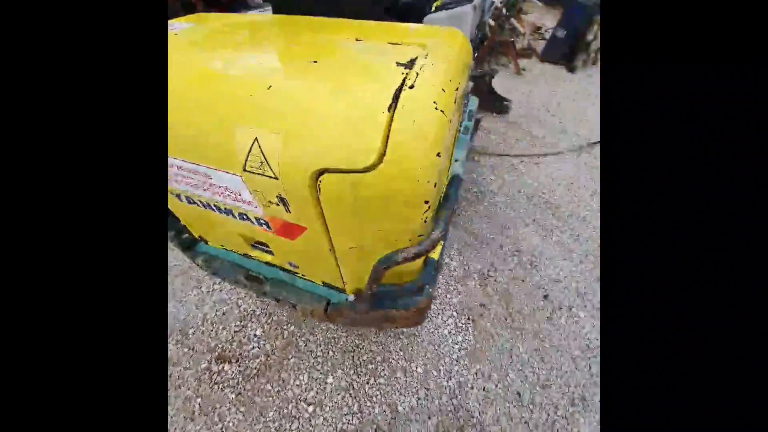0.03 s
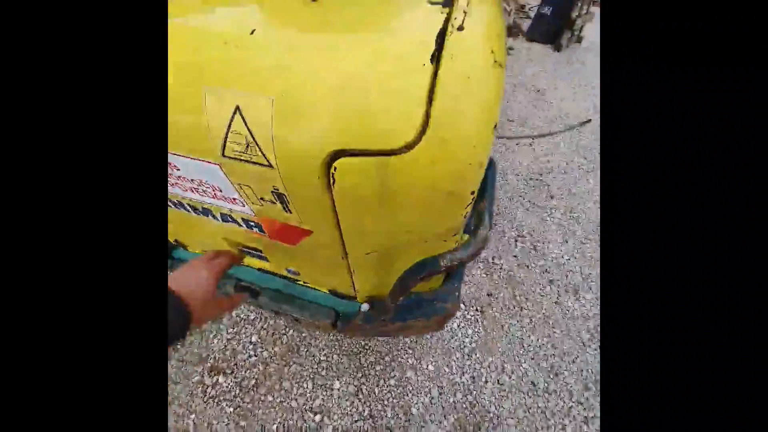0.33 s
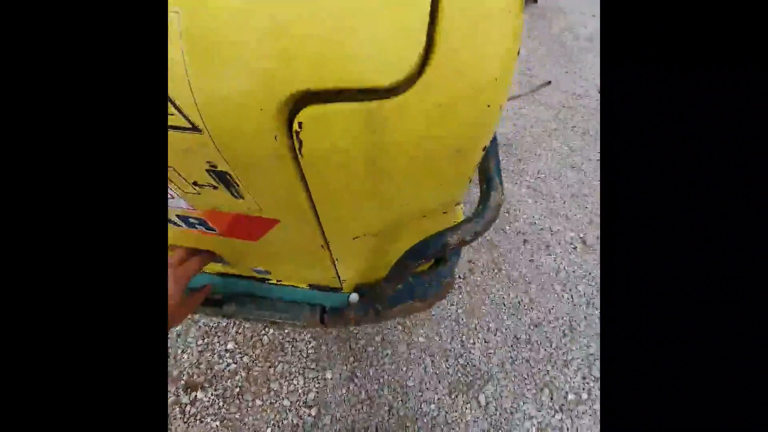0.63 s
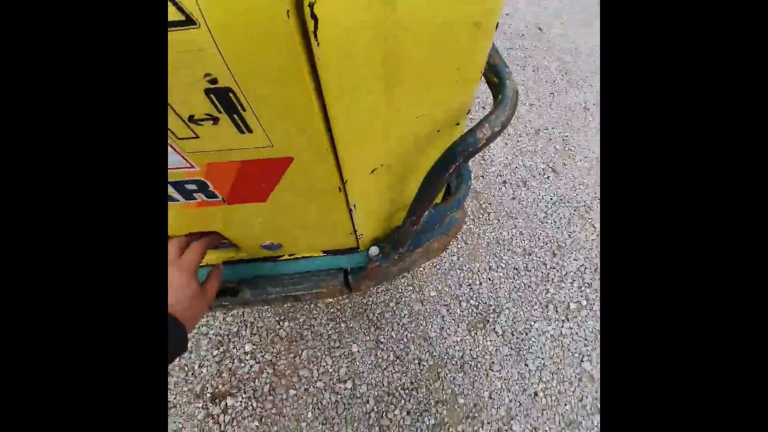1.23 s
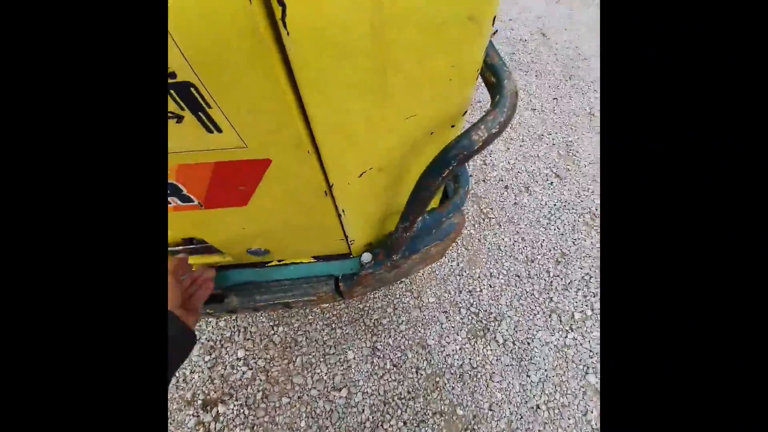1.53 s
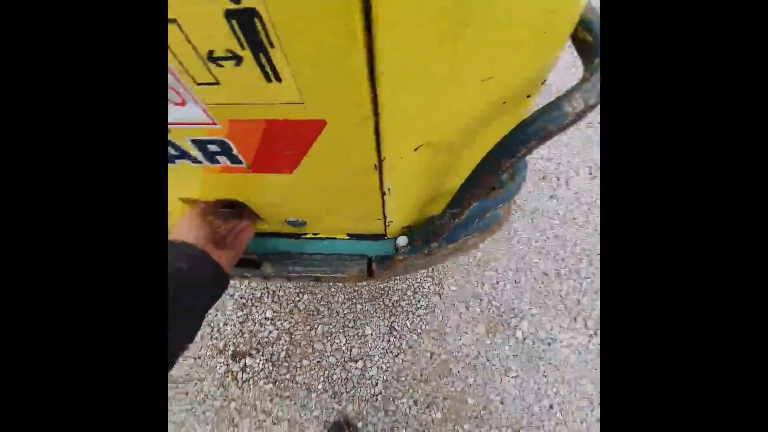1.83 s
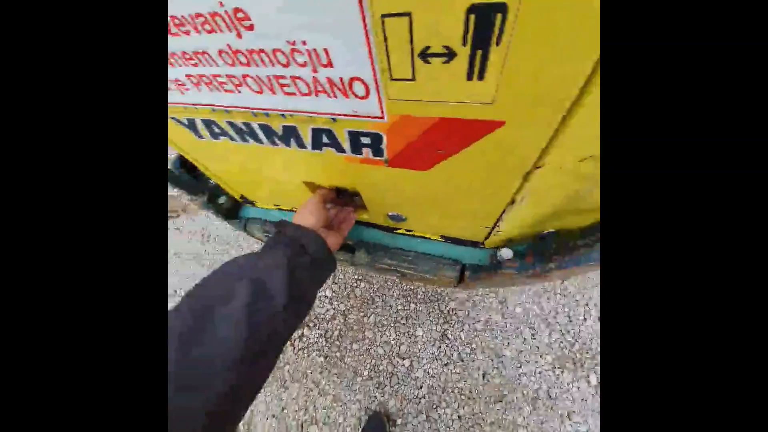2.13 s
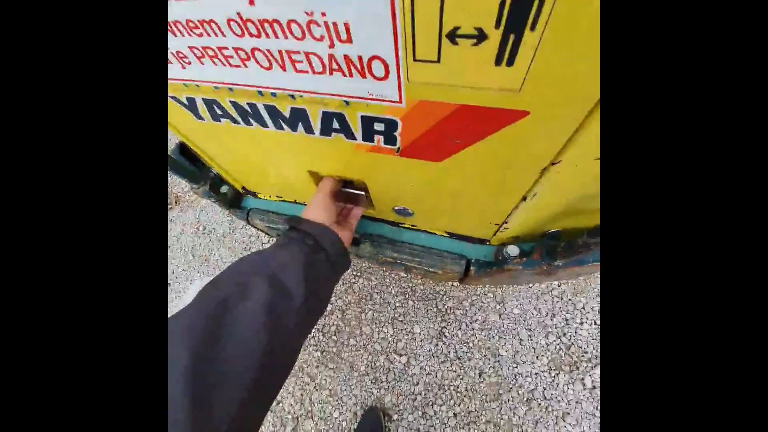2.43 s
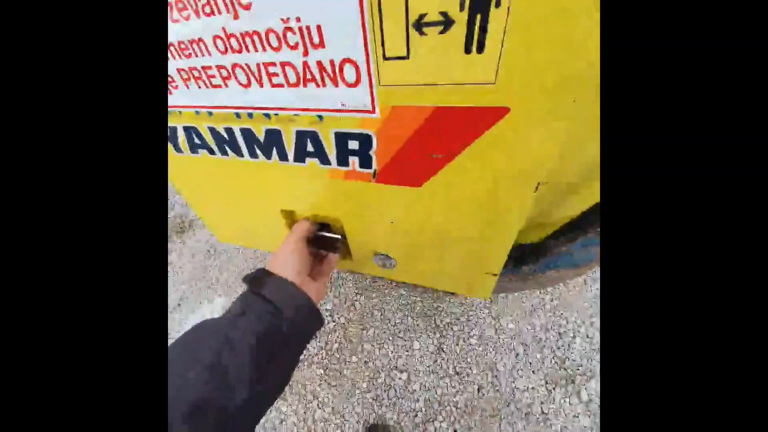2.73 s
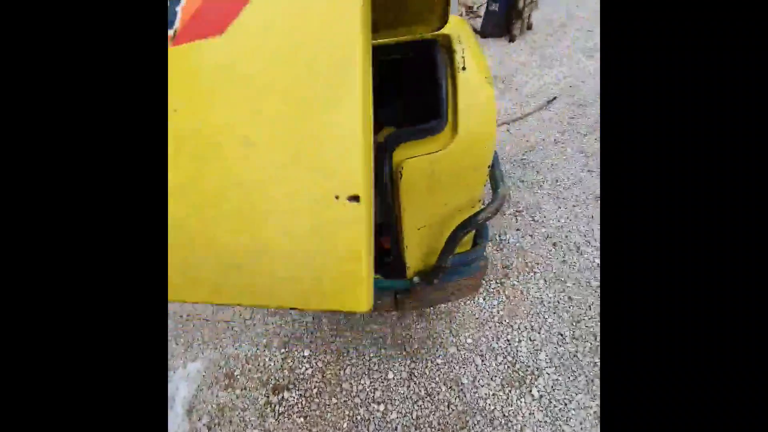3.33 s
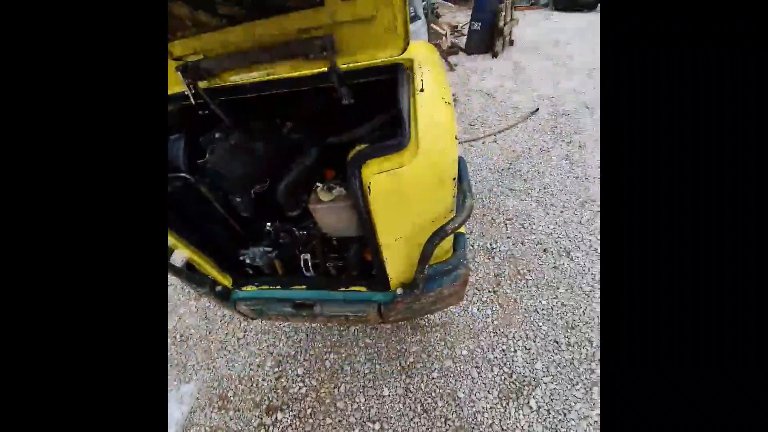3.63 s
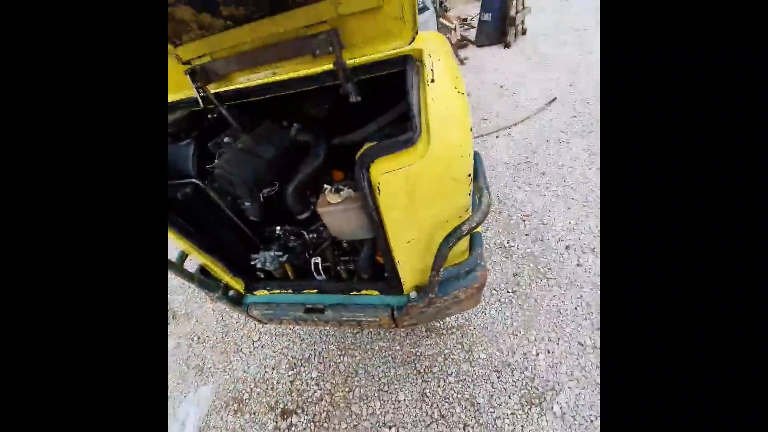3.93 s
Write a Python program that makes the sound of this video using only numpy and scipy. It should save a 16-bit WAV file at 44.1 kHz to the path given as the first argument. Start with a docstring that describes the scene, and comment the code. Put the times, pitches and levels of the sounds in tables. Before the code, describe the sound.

A sheet-metal engine cover is opened by hand, close up outdoors. It knocks on its seat, the latch scrapes, clicks and releases with a boom, then the cover rattles up and clanks into its stay over a low rumble.

```python
"""Outdoors on gravel, close up: a hand works at the sheet-metal engine cover of a machine.
The cover knocks on its seat; the steel latch scrapes, clicks and lets go with a boom. The cover shudders,
swings up rattling and clanks into its stay. Each blow is a noisy crack that rings the steel, over the
boom of the panel's low modes. Behind it: a low rumble, a soft hiss and a faint whine."""
import sys
import numpy as np
from scipy import signal
from scipy.fft import rfft, irfft, next_fast_len
from scipy.io import wavfile
from scipy.ndimage import map_coordinates

SR = 44100
rng = np.random.default_rng(int(sys.argv[2]) if len(sys.argv) > 2 else 0)


def waveform_to_disk(signal):
    """Save audio, clipped to [-1, 1], as 16-bit WAV at the path in sys.argv[1]."""
    frames = np.transpose(np.atleast_2d(signal))
    scaled = np.clip(frames, -1, 1) * 32767
    samples = np.round(scaled).astype(np.int16)
    wavfile.write(sys.argv[1], SR, samples)


N = 176400

CLICK_CRACK_S, CLANK_CRACK_S = .018, .036  # t60 of the crack of latch and stay
# Stereo image of the cover: f/Hz, left-right likeness
COVER_IMAGE = [(150, 0.99), (500, 0.71), (1500, 0.27), (5000, 0.41), (14000, 0.069)]
# The cover hits its stay: t/s, level/dB, boom/dB, body/dB, clang/dB, bite/dB, treble/dB, base t60/s
STAY_BLOW = [(3.933, -6.5, -30, -24, -18, -13.5, -14, 0.13)]
# Its contact settings for blows(); tone: f/Hz, level/dB
STAY_CONTACT = dict(crack_s=CLANK_CRACK_S, ring_db=0, again_s=.0066, again_t60=0.021, again_db=3, gain_db=-1, tone=[(200, -10),
                (520, 1), (850, -3), (1750, 7), (2300, -2.5), (4000, -1), (6000, 5), (9000, -3.5),
                (12500, -1), (16000, -11)])
STOP_S = STAY_BLOW[0][0] + STAY_CONTACT["again_s"]


def amp(db):
    """Decibels to gain."""
    return 10 ** (np.asarray(db) / 20)


def unit(x):
    """Scale to rms 1."""
    return x / np.sqrt(np.mean(x ** 2) + 1e-20)


def fade(t, t60):
    """Exponential decay."""
    return np.exp(-np.log(1000) * t / max(t60, 1e-3))


def along(points, hz):
    """Read (f/Hz, value) points on a log axis."""
    f, v = np.transpose(points)
    return np.interp(np.log(hz + 1), np.log(f + 1), v)


def curve(points):
    """Read (t/s, value) points at every sample."""
    return np.interp(np.arange(N) / SR, *np.transpose(points))


def wobble(rate):
    """A smooth random curve, rate knots a second."""
    return map_coordinates(rng.standard_normal(int(N * rate / SR) + 4), [np.arange(N) * rate / SR])


def add(track, s, sound):
    """Mix a sound in at time s."""
    part = track[:, max(round(s * SR), 0):][:, :sound.shape[-1]]
    part += sound[..., :part.shape[1]]


def noise(tone, image, size=N):
    """Stereo noise of rms 1 with a given colour and left-right likeness."""
    hz = np.fft.rfftfreq(size, 1 / SR)
    turn = np.arccos(np.clip(along(image, hz), -1, 1)) / 2
    spectrum = rfft(rng.standard_normal((2, size))) * amp(along(tone, hz))
    mid, side = irfft(spectrum * [np.cos(turn), np.sin(turn)], size)
    return unit(np.array([mid + side, mid - side]))


def causal(db):
    """The minimum-phase response with this gain."""
    cepstrum = irfft(db * np.log(10) / 20)
    cepstrum[1:len(cepstrum) // 2] *= 2
    cepstrum[len(cepstrum) // 2 + 1:] = 0
    return np.exp(rfft(cepstrum))


def burst(t, t60, rise_s=0.0017):
    """Dying stereo noise of energy 1 a channel."""
    envelope = (1 - np.exp(-(t / rise_s) ** 2)) * fade(t, t60)
    return unit(noise([(1, 0)], COVER_IMAGE, size=len(t)) * envelope) / np.sqrt(len(t))


def yard_air():
    """A wide, soft hiss over the midrange of the yard."""
    # Fader rides: t/s, level/dB
    hiss_ride = [(0, -57), (.35, -53.5), (.8, -60.5), (1.45, -62.5), (1.75, -67.5), (2.1, -63.5),
                 (2.85, -63.5), (3.12, -64.5), (3.33, -75), (4, -75)]
    mid_ride = [(0, -48), (.35, -45), (.9, -51), (2.3, -51), (3.05, -55), (4, -54)]
    # Colours: f/Hz, level/dB
    hiss_tone = [(1760, -36), (3000, -7), (3860, 4), (5070, -3.5), (6860, -0.5), (9140, -12), (12400, -0.5),
                 (16000, -8)]
    mid_tone = [(160, -36), (280, -4.5), (639, -7), (942, -14.5), (1440, -11), (3200, -17), (4160, -38),
                (7040, -120)]
    # Stereo image: f/Hz, left-right likeness
    image = [(60, 0.96), (180, 1), (550, 0.25), (1650, -0.22), (4970, -0.018), (15000, -0.12)]
    hiss = amp(curve(hiss_ride) + 3) * noise(hiss_tone, image)
    return hiss + amp(curve(mid_ride) + 0.5) * noise(mid_tone, image)


def rumble(lump_db=3.5):
    """Handling and air make a lumpy low end, almost mono."""
    # Fader ride: t/s, level/dB
    ride = [(0, -45), (.5, -38.5), (.8, -43.5), (1, -39), (1.5, -41), (1.68, -39.5), (1.74, -34.5),
            (1.8, -39), (2.28, -39.5), (2.56, -34), (2.75, -47), (4, -46)]
    # Colour: f/Hz, level/dB
    tone = [(12, -42), (20, -9), (50, -0.5), (113, -9.5), (156, -8.5), (315, -17), (420, -48), (700, -120)]
    return amp(curve(ride)) * unit(amp(lump_db * wobble(22.01)) * noise(tone, [(100, 0.96)]))


def whine(pitch_hz=1302, drift_hz=1.2, waver_db=1.0):
    """A thin tone that wavers slightly in pitch and level."""
    # Fader ride: t/s, level/dB
    ride = [(0, -52.5), (.8, -61), (1.1, -56), (1.8, -57), (2.25, -66), (2.9, -63), (3.3, -72), (3.6, -57),
            (4, -71)]
    phase = 2 * np.pi * np.cumsum(pitch_hz + drift_hz * wobble(8.3)) / SR
    return amp(curve(ride) - waver_db * wobble(6.93)) * np.sqrt(2) * np.sin(phase)


def contacts(rows, t60, gain_db, width, size=4096):
    """Small contacts, each a burst dying in one resonance."""
    out, t, hz = np.zeros((2, N)), np.arange(size) / SR, np.fft.rfftfreq(size, 1 / SR)
    for s, db, pitch in rows:
        band = 1j * hz * pitch * width / (pitch ** 2 - hz ** 2 + 1j * hz * pitch * width)
        touch = unit(irfft(rfft(burst(t, t60)) * band ** 2)) / np.sqrt(size)
        add(out, s, amp(db + gain_db) * touch * (1 - t / t[-1]))
    return out


def ticks():
    """Latch, handle and hinges tick and snap."""
    # Ticks: t/s, level/dB, f/Hz
    hits = [(0.055, -35.5, 6200), (0.7285, -35, 2260), (0.7457, -35.5, 2400), (0.982, -42.5, 7050),
            (1.0245, -10.5, 1600), (1.213, -15, 3400), (2.397, -14, 2650), (2.464, -16, 2700),
            (3.3139, -32.5, 1960), (3.6387, -34.5, 6200)]
    return contacts(hits, t60=0.018, gain_db=16.5, width=0.29)


def taps():
    """Fingers and catch tap the hollow cover."""
    # Taps: t/s, level/dB, f/Hz
    hits = [(.168, -29.5, 415), (.616, -22.5, 517), (1.025, -23, 795), (1.337, -24, 633), (2.305, -30, 410),
            (3.228, -30, 398)]
    return contacts(hits, t60=0.031, gain_db=20.5, width=0.18)


def steel(hz, scatter_db=2.5):
    """Flat response of the sheet with its ringing modes on top, their heights drawn anew each call."""
    # Modes of sheet and fittings: f/Hz, height/dB, t60/s
    modes = [(414, -2, 0.23), (521, -0.5, 0.14), (599, 1, 0.12), (725, 2.5, 0.077), (1217, 1, 0.094),
             (2080, 2.5, 0.064), (2650, 3, 0.1), (3090, 0, 0.11), (3420, -4.5, 0.36), (4490, -0.5, 0.17),
             (6600, -5, 0.11)]
    response = 1
    for pitch, db, t60 in modes:
        loss = 1j * hz * np.log(1000) / np.pi / t60
        response += amp(db + rng.normal(0, scatter_db)) * loss / (pitch ** 2 - hz ** 2 + loss)
    return response


def ring(t, t60, low_hz=576, top_hz=7800):
    """The dense ring of the sheet, longest in the bass and shortest in the top."""
    bands = [("low", low_hz, 1.9), ("band", [low_hz, top_hz], 0.97), ("high", top_hz, 0.74)]
    return sum(signal.sosfilt(signal.butter(2, hz, kind, fs=SR, output="sos"), burst(t, stretch * t60))
               for kind, hz, stretch in bands)


def boom(t, ring_t60, push_s=0.0047, scatter_db=2.0):
    """The panel's low modes after a short push, damped by the hand."""
    # Panel modes: f/Hz, level/dB, undamped t60/s
    modes = [(101.4, -11.5, 0.34), (140, 2, 0.071), (163.8, -9, 0.48), (180, 2.5, 0.068),
             (228.6, -13, 0.088)]
    swing = sum(amp(db + rng.normal(0, scatter_db, (2, 1))) * fade(t, t60) * np.sin(2 * np.pi * hz * t)
                for hz, db, t60 in modes)
    hand = fade(t, 5.6 * ring_t60)
    return unit(swing * (1 - np.exp(-t / push_s)) * hand) / np.sqrt(len(t))


def blows(rows, crack_s, ring_db, again_s, again_t60, again_db, gain_db, tone, size=16384):
    """Each blow cracks (t60 crack_s), touches again after again_s, rings the steel and booms the panel."""
    # Edges of the body, clang, bite and treble bands: f/Hz
    band_edges = [300, 1100, 2200, 4500, 15000]
    # Panning: t/s, left lead/ms, left over right/dB
    positions = [(0.529, 0.011, -2.5), (0.609, -0.44, -3), (1.03, -0.013, -0.5), (2.4, 0.122, 2),
                 (3.8, 0.25, 0.5)]
    out, t, hz = np.zeros((2, N)), np.arange(size) / SR, np.fft.rfftfreq(size, 1 / SR)
    edges, sides, metal = np.array(band_edges), np.array([[.5], [-.5]]), steel(hz)
    centres, shares = np.sqrt(edges[1:] * edges[:-1]), np.diff(edges) / (SR / 2)
    when, leads, pans = np.transpose(positions)
    taper = np.cos(np.pi / 2 * t / t[-1]) ** 2
    blow_s = 0.017  # sets a blow's energy: its level held for this long
    for s, db, boom_db, *bands_db, t60 in rows:
        hit = burst(t, crack_s) + amp(ring_db) * ring(t, t60)
        add(hit, again_s, amp(again_db) * burst(t, again_t60, rise_s=0.00044))
        band_eq = list(zip(centres, bands_db - 10 * np.log10(shares)))
        colour = causal(along(band_eq, hz) + along(tone, hz))
        lead_s = np.interp(s, when, leads) / 1000
        place = amp(sides * np.interp(s, when, pans)) * np.exp(2j * np.pi * hz * sides * lead_s)
        hit = irfft(rfft(unit(hit) / np.sqrt(size)) * colour * metal * place) * taper
        blow = amp(gain_db) * hit + amp(boom_db) * boom(t, t60)
        add(out, s, amp(db) * np.sqrt(blow_s * SR) * blow)
    return out


def cover_knocks():
    """The cover knocks on its seat."""
    # Knocks: t/s, level/dB, boom/dB, body/dB, clang/dB, bite/dB, treble/dB, base t60/s
    hits = [(0.529, -21, -12.5, -6, -14.5, -22.5, -22, 0.064),
            (1.024, -8, -12.5, -17, -17.5, -40, -51, 0.13), (1.242, -15.5, -9, -7.5, -8, -25, -35, 0.097),
            (1.335, -11, -16, -16.5, -13, -29, -32, 0.099), (1.95, -26.5, -13, -13.5, -10, -21, -29, 0.27),
            (2.178, -26.5, -4, -4, -26.5, -29, -28, 0.14), (2.355, -18, 3.5, -9.5, -15, -21, -30.5, 0.042),
            (3.219, -34, -3.5, -1.5, -17, -36, -46, 0.24)]
    # Cover on seat; tone: f/Hz, level/dB
    contact = dict(crack_s=0.014, ring_db=-3.5, again_s=.007, again_t60=0.016, again_db=-6.5, gain_db=-3, tone=[(150, 0),
               (800, 0.5), (1200, -3.5), (1750, 3), (4400, -0.5), (7000, -1), (9000, -8), (12500, -6),
               (16000, -18)])
    return blows(hits, **contact)


def latch_clicks():
    """The steel latch clicks and lets go with a boom."""
    # Clicks: t/s, level/dB, boom/dB, body/dB, clang/dB, bite/dB, treble/dB, base t60/s
    hits = [(0.599, -27.5, -29, -7.5, -27, 0, -1, 0.077),
            (0.615, -16.5, -22.5, -17, -19.5, -10, -9.5, 0.063),
            (1.212, -9.5, -23, -17, -10, -18, -15, 0.09), (2.396, -7, -4.5, -18, -13, -9, -10, 0.034),
            (2.463, -6.5, -31, -23.5, -13.5, -18, -12.5, 0.048)]
    # Latch on catch; tone: f/Hz, level/dB
    contact = dict(crack_s=CLICK_CRACK_S, ring_db=-2.5, again_s=.0025, again_t60=0.0076, again_db=-3, gain_db=-3, tone=[(300, 2),
               (1100, -4.5), (4400, -8), (5300, -8.5), (6600, -1.5), (9000, -17), (12800, -6),
               (16000, -24)])
    return blows(hits, **contact)


def latch_scrape(grain_db=4):
    """The latch slides on its catch, steel slipping on steel in fine jerks."""
    # Fader ride: t/s, level/dB
    ride = [(1.135, -81), (1.155, -40), (1.185, -37), (1.208, -38.5), (1.225, -58), (1.29, -49),
            (1.32, -53)]
    # Colour: f/Hz, level/dB
    tone = [(120, -24), (200, 6.5), (968, -8.5), (1710, -19), (6050, -17), (9060, -30), (11100, -19),
            (16000, -28)]
    return amp(curve(ride)) * unit(noise(tone, COVER_IMAGE) * amp(grain_db * wobble(260)))


def shudder(start_s=2.404, db=-18.5, low_t60=0.4, treble_t60=0.21, split_hz=1400):
    """The freed cover chatters; the treble dies first."""
    # Colour: f/Hz, level/dB
    tone = [(29, -38), (50, 1.5), (167, -9), (601, -24.5), (729, -13.5), (1020, -24.5), (1500, -19),
            (7570, -34.5), (9000, -42.5)]
    out, t = np.zeros((2, N)), np.arange(N) / SR
    sheet = irfft(rfft(noise(tone, COVER_IMAGE)) * steel(np.fft.rfftfreq(N, 1 / SR)), N)
    chatter = unit(sheet * amp(1.4 * wobble(297)))
    low = signal.sosfilt(signal.butter(1, split_hz, fs=SR, output="sos"), chatter)
    add(out, start_s, amp(db) * (low * fade(t, low_t60) + (chatter - low) * fade(t, treble_t60)))
    return out


def cover_rattles():
    """The cover rattles in light blows as it swings up."""
    # Rattles: t/s, level/dB, boom/dB, body/dB, clang/dB, bite/dB, treble/dB, base t60/s
    hits = [(2.507, -22, -23, -10, -8, -16.5, -14.5, 0.16), (2.574, -28, -6.5, -7.5, -5.5, -9, -9.5, 0.065),
            (2.684, -27.5, -37, -10.5, -7.5, -9.5, -55, 0.076),
            (2.75, -32.5, -22, -13, -5, -7.5, -19, 0.027), (3.725, -33, -17, -10.5, -4.5, -7.5, -32, 0.11),
            (3.771, -27, -28, -7, -7.5, -11, -20.5, 0.084)]
    # Loose contact; tone: f/Hz, level/dB
    contact = dict(crack_s=0.032, ring_db=1.5, again_s=.007, again_t60=0.019, again_db=-3, gain_db=-5, tone=[(300, 0),
               (6600, -2), (9000, -14), (16000, -23)])
    return blows(hits, **contact)


def rasp(db=-24, swell_t60=0.068):
    """A short rasp swells into the last clank and cuts off at the stop."""
    # Colour: f/Hz, level/dB
    tone = [(500, -19), (1500, 2), (16000, -21)]
    to_stop = STOP_S - np.arange(N) / SR
    return amp(db) * (to_stop > 0) * fade(np.abs(to_stop), swell_t60) * noise(tone, COVER_IMAGE)


def stay_clank(lowest_t60=0.37):
    """The stay clanks into its stop and sings on with the cover; higher partials die sooner."""
    # Partials: f/Hz, level/dB
    modes = [(460, -32), (603, -28.5), (1626, -34), (3246, -37), (3854, -36), (6508, -40)]
    out, t = blows(STAY_BLOW, **STAY_CONTACT), np.arange(SR // 2) / SR
    for hz, db in modes:
        t60 = lowest_t60 * (hz / modes[0][0]) ** -.3
        phase = 2 * np.pi * rng.random((2, 1))
        add(out, STOP_S, amp(db) * fade(t, t60) * np.sin(2 * np.pi * hz * t + phase))
    return out


def scene():
    """The cover is unlatched and lifted over the outdoor bed."""
    bed = yard_air() + rumble() + whine()
    unlatching = ticks() + taps() + cover_knocks() + latch_clicks() + latch_scrape()
    lifting = shudder() + cover_rattles() + rasp() + stay_clank()
    return bed + unlatching + lifting


def record(dry):
    """Hard-limit at full scale, then cut the extreme top."""
    size, top_hz = next_fast_len(N + SR // 2), 15900
    passband = np.fft.rfftfreq(size, 1 / SR) < top_hz
    return irfft(rfft(np.clip(dry, -1, 1), size) * passband, size)[:, :N]


dry = scene()
out = record(dry)
waveform_to_disk(out)
```